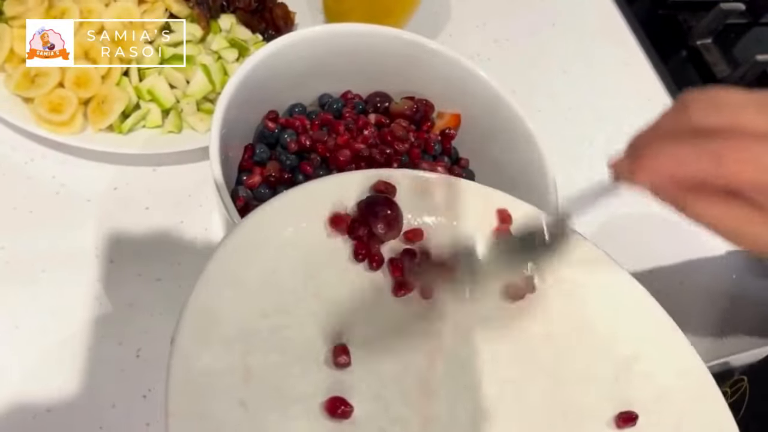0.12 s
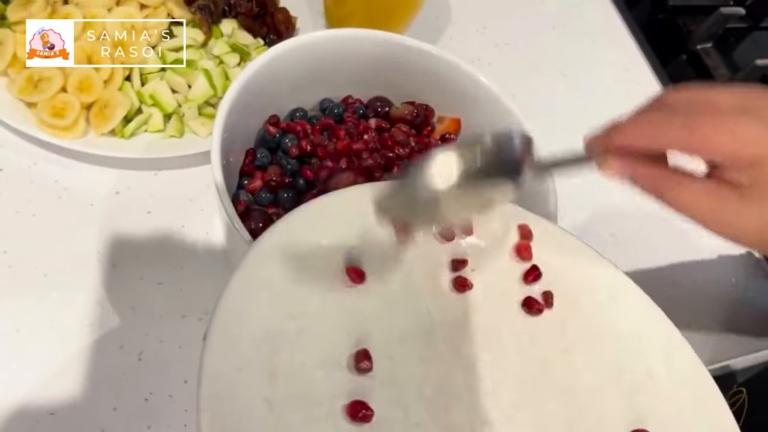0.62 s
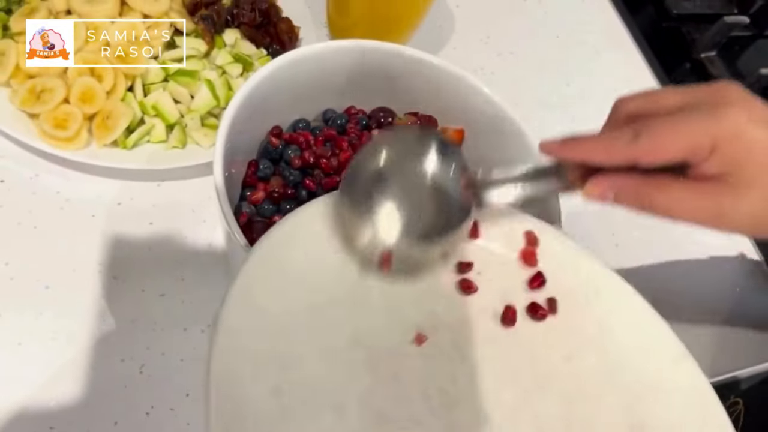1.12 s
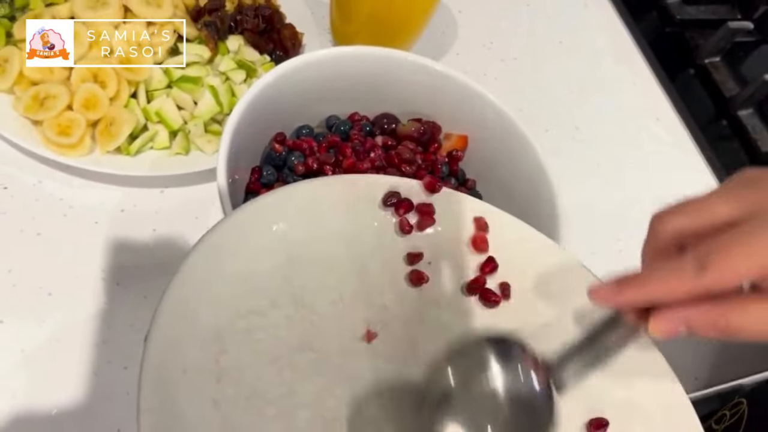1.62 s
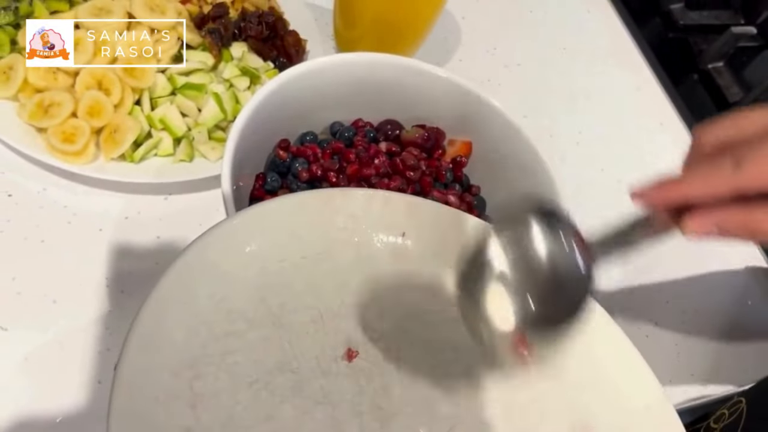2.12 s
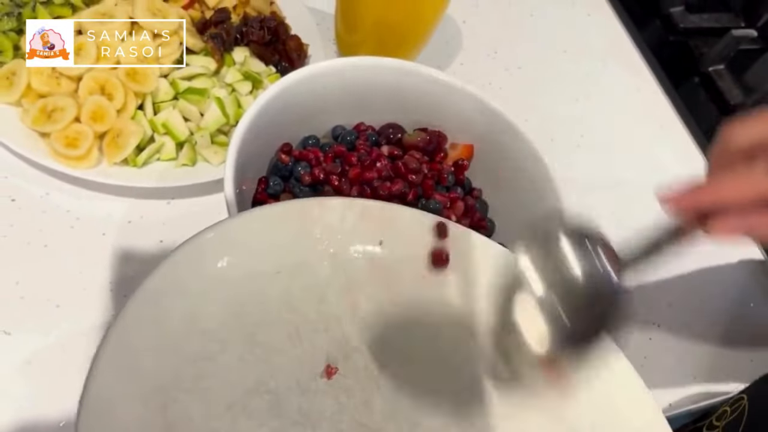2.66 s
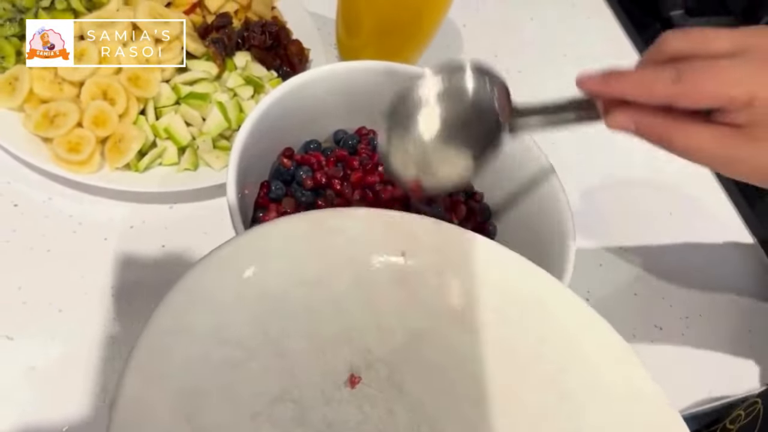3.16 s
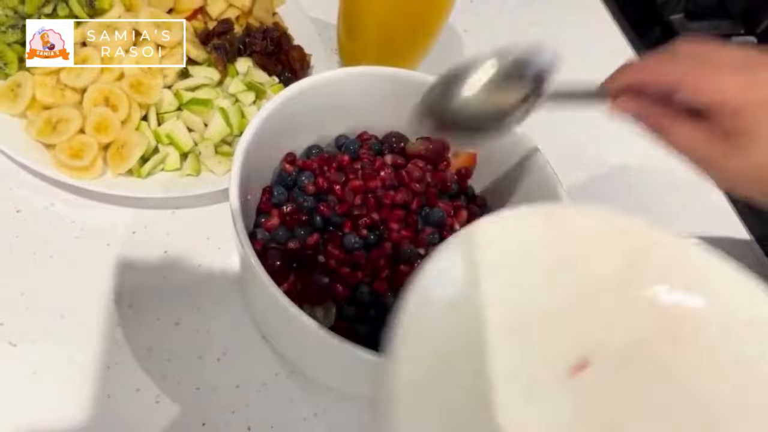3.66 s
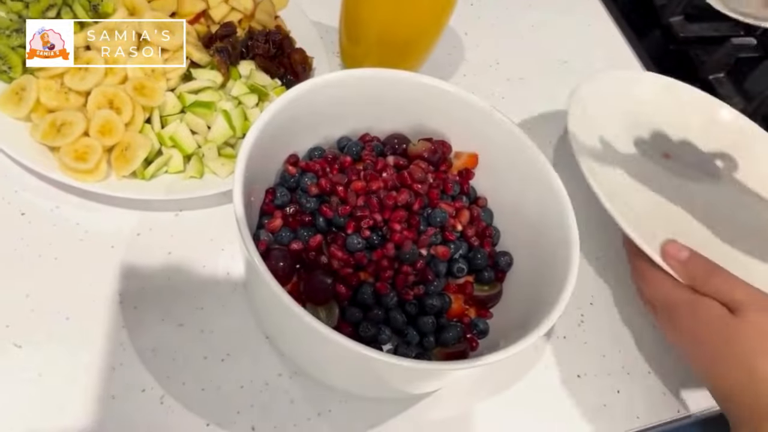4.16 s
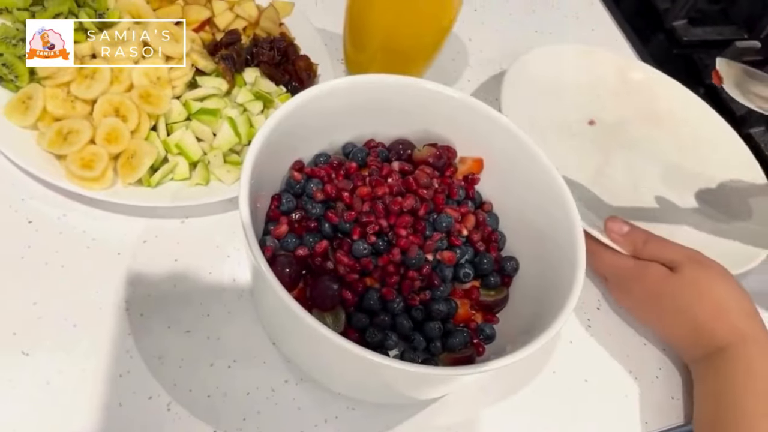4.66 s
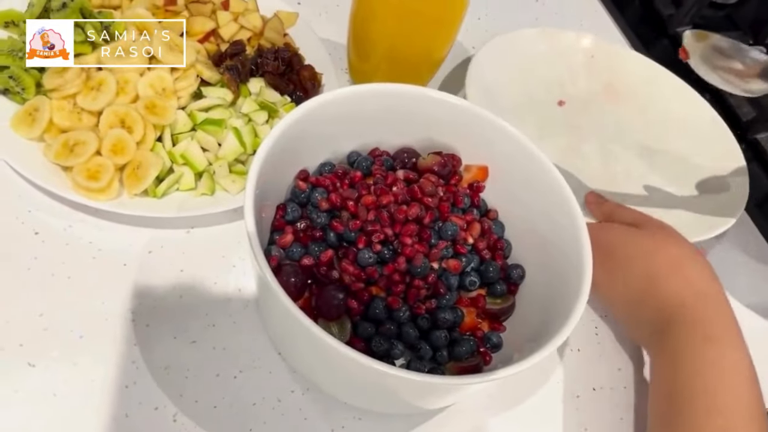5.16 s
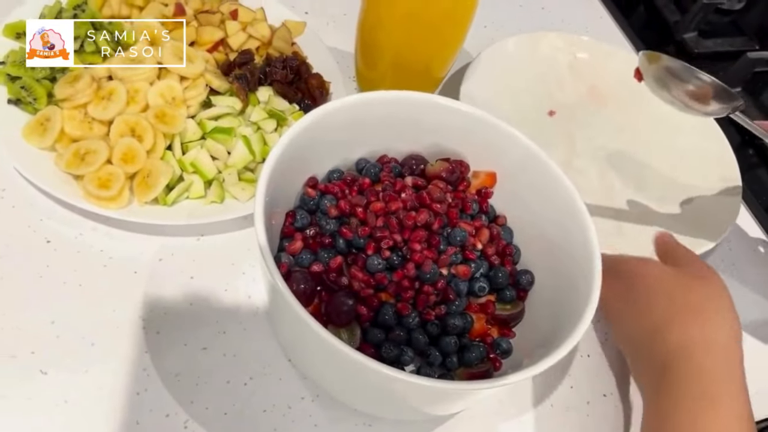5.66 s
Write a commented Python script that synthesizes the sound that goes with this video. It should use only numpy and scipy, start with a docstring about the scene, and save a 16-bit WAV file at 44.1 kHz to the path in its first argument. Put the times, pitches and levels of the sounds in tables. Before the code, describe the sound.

A metal spoon lands on a ceramic plate and scrapes across it repeatedly, then the plate is set down on a stone counter.

```python
"""A steel spoon lands on a hand-held ceramic plate and scrapes across it five times, once chattering hard.
The plate is then set on a stone counter, slides twice and rocks flat. Gritty friction and short blows drive
a bank of ring modes; the hollow under the spoon adds gliding noise, the counter low thuds. A quiet kitchen
hums, hisses and answers with a decaying noise tail."""
import sys
import numpy as np
from scipy import signal
from scipy.fft import rfft, irfft, next_fast_len
from scipy.io import wavfile
from scipy.ndimage import map_coordinates

SR = 44100
rng = np.random.default_rng(int(sys.argv[2]) if len(sys.argv) > 2 else 0)


def attenuation_scalar(level_db):
    """Turn a level in dB into a linear amplitude multiplier (20 dB per decade)."""
    decades = np.asarray(level_db, float) / 20
    return 10 ** decades


def inscribe(sig):
    """Save sig as 16-bit PCM at rate SR to the path in sys.argv[1].

    A 1-D sig is mono; a 2-D sig holds one channel per row.
    Samples are clipped to [-1, 1] before scaling.
    """
    pcm = np.round(np.clip(np.atleast_2d(sig).T, -1, 1) * 32767)
    wavfile.write(sys.argv[1], SR, pcm.astype(np.int16))


N = 255339
PADDED_N = next_fast_len(N + SR)
BINS_HZ = np.fft.rfftfreq(PADDED_N, 1 / SR)
TIME_S = np.arange(N) / SR

# Appliance hum. Each row: pitch in Hz, level in dB rms.
HUM_HZ_DB = [(48.4, -59.5), (118.4, -68), (247.6, -78), (296.1, -68.5), (425.3, -81), (538.3, -80.5)]
# Room air spectrum. Each row: frequency in Hz, relative density in dB per Hz.
AIR_HZ_DB = [(15, -37), (25, -7.5), (55, 3.5), (77, -16), (129, -20), (221, -26), (297, -21.5), (322, -29),
             (537, -28), (648, -36), (762, -29.5), (826, -40.5), (15500, -65.5)]
# Left-right likeness of the air. Each row: frequency in Hz, likeness 0-1.
ALIKE_HZ_SHARE = [(60, 0.92), (240, 0.48), (950, 0.14), (3770, 0.079), (15000, 0.88)]
# Faint hiss as the arm swings away. Each row: time in seconds, level in dB.
RUSTLE_S_DB = [(3.75, -82.5), (3.87, -73.5), (4.21, -80), (4.264, -71.5), (4.36, -78)]
# Decay of the kitchen. Each row: frequency in Hz, t60 in seconds.
KITCHEN_HZ_T60_S = [(200, .5), (1000, 0.28), (4000, 0.4131), (10000, 0.2)]
# Counter modes. Each row: pitch in Hz, t60 in seconds.
COUNTER_HZ_T60_S = [(140, 0.25), (235, 0.15), (345, 0.1)]
# Thuds. Each row: start in seconds, level in dB, dB more for each higher counter mode.
THUDS = [(.229, -40, 7), (0.375, -67.5, 12.5), (.896, -53, 9), (1.557, -50.5, 2.5), (2.323, -65, -0.5),
         (2.855, -54, -6.5), (4.402, -35.5, 1.5), (4.435, -34.5, 2.5), (4.569, -43.5, 3), (4.895, -50, -1),
         (5.188, -58, 11), (5.602, -30, -4)]
# A cloth rustles. Each row: time in seconds, level in dB.
BRUSH_S_DB = [(4.17, -76), (4.26, -64), (4.37, -71)]
# One faint ping: start in seconds, pitch in Hz, level in dB, t60 in seconds.
PING = (2.74, 1871.5, -74, .3)
# Hollow between spoon bowl and plate, a list per stroke. Each row: time in seconds, pitch in Hz, dB rms.
HOLLOW = [
    [(.34, 674.2, -56), (.375, 568.3, -45.5), (.42, 581.4, -49.5), (.475, 602.3, -50.5), (.525, 603, -57.5)],
    [(.93, 720, -54.5), (.99, 862, -42.5), (1.05, 901.7, -50), (1.1, 1141, -49.5), (1.15, 1009, -55),
     (1.2, 930.8, -49.5), (1.25, 920.5, -56.5)],
    [(1.6, 1098, -48), (1.65, 1099, -49.5), (1.71, 1044, -46), (1.73, 743.9, -46), (1.8, 773.3, -51),
     (1.85, 908, -59.5)],
]
# Plate and spoon modes. Each row: pitch in Hz, width in Hz, level in dB relative within its group,
# left over right in dB, left lead in radians.
MODES = [(405, 400, -21, -0.5, 0.6305), (559.43, 81, -17.5, -1, 1), (761.68, 70, -12, -8, 2.5),
         (1043.6, 30, -7.5, -5.5, 1.5), (880, 1600, -13, -1, 1.2111), (1321.6, 66, -14, -3.5, 1.5),
         (1468, 280, -11, 2, 3.5), (1705.4, 43, -8, 2, 1.0652), (2003.2, 100, -13, 1, 3.5),
         (1830, 1300, -14, -0.5, 1), (2500, 240, -14, -8, -1), (2651.8, 17, -1, 0.5, 1.5924),
         (2509.8, 120, -15.5, -1, 4.5), (2738.9, 21, -9.5, 0, 0.9508), (3113.5, 40, -13, -3, 4),
         (2884.5, 790, -21.5, 3.5, 4), (3728.9, 92, -2.5, -4, 1.8507), (3920.3, 80, -9.5, -6, -5),
         (4318.5, 40, -11, -9, -3), (4428.1, 24, -4, -9.5, 0.619), (4820, 60, -26, -7.5, -5),
         (3920.2, 2500, -16.5, -1.5, 1.2489), (5233.9, 50, -4, -10.5, 3), (5774.9, 61, -9.5, -1, 0.5525),
         (5674.4, 40, -18.5, -2, -4.5), (6422, 110, -13.5, -2.5, -3.5849), (6820, 60, -13, -7, -11),
         (6000, 1800, -38, 2, -3), (7500.7, 70, -19, -0.5, -0.5734), (8696, 140, -29, -4, -1.0511),
         (9076.7, 45, -23, -3, 0.7207), (9721.5, 130, -19.5, -0.5, 1.5042), (11351, 270, -29.5, 1, 1.259),
         (11100, 77, -30, 0.5, 6), (12160, 60, -28, 1, 1.5), (13900, 150, -25, -2, 1.344),
         (15000, 90, -35, -0.5, 6), (8330, 63, -30, 2, 4), (12660, 72, -42.5, 6, 1.7455),
         (14430, 80, -33, -1, 3.5)]
# Edges between the six groups of modes, in Hz.
GROUP_EDGES_HZ = [1200, 2300, 3300, 5000, 7000]
# Chattering edge. Each row: time in seconds, bounces per second, share of the drive 0-1.
CHATTER = [(2.3, 150, .05), (2.35, 150, .5), (2.44, 150, .1), (2.85, 150, .1), (2.87, 150, .8),
           (2.93, 200, .9), (2.97, 170, .9), (3.0, 135, .9), (3.06, 165, .8), (3.1, 165, .1)]
# Where bounces drive the modes. Each row: frequency in Hz, part of the share 0-1.
CHATTER_HZ_PART = [(1700, 1), (3500, .55), (6400, .7), (9000, .3)]
# Modes that sing out or are held down as the contact passes their moving parts or nodes.
# Each row: start in seconds, end in seconds, pitch in Hz, extra dB.
SINGS = [(.225, .3, 4440, 8), (.37, .53, 8700, 6), (.38, .5, 3127, -10), (.38, .5, 2886, -8),
         (.44, .52, 4820, 8), (.225, .25, 760, 6), (.91, .97, 2648, 5), (1.05, 1.16, 3960, 6),
         (1.1, 1.21, 2010, 12), (1.127, 1.195, 4440, 8), (1.19, 1.25, 3700, 6), (1.55, 1.63, 2727, 8),
         (1.64, 1.76, 5780, 6), (1.74, 1.82, 2727, 7), (1.75, 1.84, 6420, 6), (1.78, 1.84, 3700, 5),
         (2.32, 2.39, 2648, 13), (2.32, 2.4, 3960, 9), (2.475, 2.52, 2648, 8), (2.85, 3.05, 880, 5),
         (2.85, 3.05, 1830, 5), (2.85, 3.05, 1279, 5), (2.85, 2.98, 4440, 7), (2.9, 3.04, 6420, 7),
         (2.93, 3.01, 2648, 6), (4.4, 4.47, 2010, 7), (4.42, 4.5, 2648, 5), (4.56, 4.62, 550, 8),
         (4.7, 4.98, 3960, 4), (5.6, 5.66, 1040, 7), (5.6, 5.75, 550, -6)]
# Clean landings. Each row: start in seconds, seconds until the pressing hand damps the ring.
LANDINGS = [(.229, .1), (.894, .11), (1.554, .045)]
# Modes that ring freely after a landing. Each row: pitch in Hz, extra dB.
FREE_HZ_DB = [(1710, 10), (2648, 2), (3966, 10.5), (4440, 0.5), (5770, -1), (5830, 5), (7520, 7)]
# Spoon strokes; the first list is the dying room tail of an earlier stroke.
# Each row: time in seconds, pressure in dB, brightness in dB per octave,
# place in steps from the dish centre (negative) to the rim (positive).
STROKES = [
    [(0, -50.5, 0, -2), (.03, -61.5, 0, -2), (.1, -71.5, 6, -1)],
    [(.24, -22.5, -2, -1), (.254, -34, 1.5, 0.5), (.282, -41, 2.5, -0.5), (.358, -52.5, -0.5, 1),
     (.385, -45.5, 3.5, -2.5), (.504, -44.5, 1, -2.5), (.53, -54, -2.5, 0)],
    [(.904, -27, 1, 1.5), (.94, -33, 1.5, 1), (.97, -30.5, 0, 1.5), (1.046, -36, 3, 1),
     (1.14, -37.5, 1, 1.5613), (1.206, -39, 6, 0.13), (1.25, -45, 3, 0)],
    [(1.564, -26.5, 0.5, 0.97), (1.612, -36, 1, 1), (1.662, -36, 4, 0.98), (1.722, -32, 0.5, 0.47),
     (1.762, -30.5, -1, 0.9903), (1.802, -31, 0, 1), (1.85, -46.5, 9.5, 0.8)],
    [(2.332, -32.5, -2, 0.9278), (2.386, -38.5, 1, 0.4235), (2.4, -47.5, 2, 0.5957),
     (2.44, -57, -1.5, 0.9002)],
    [(2.482, -43, 2.5, .5), (2.492, -52, 2.5, 0.7), (2.53, -64, 0.5, 0.57)],
    [(2.864, -23.5, 0, -1), (2.888, -25.5, -2.5, -1), (2.93, -22.5, -0.5, -1), (2.956, -18.5, -1, -.5),
     (3.008, -19.5, 3, 0), (3.048, -28, 3, 0), (3.07, -41, 2, 1)],
]
# The plate's foot drags on the counter. Columns as in STROKES.
SLIDES = [
    [(4.412, -32.5, -0.9236, 1.904), (4.44, -40, -1.139, 1.711), (4.52, -50, 1, 0.324),
     (4.574, -57, 0.463, 0), (4.67, -57, 1, 1.069), (4.734, -53.5, 1, 0.72), (4.916, -50.5, 0.502, 0.1863),
     (5.064, -63, -4.729, 0), (5.12, -81.5, 0.077, 0.374)],
    [(5.15, -85, -3, -1), (5.19, -74, -7, -0.828), (5.238, -78.5, 1, 0), (5.272, -57.5, -3, 0),
     (5.33, -50.5, -1, 0.827), (5.38, -49.5, -0.5, 0.52), (5.502, -68.5, -4, -0.3), (5.56, -64, 2.5, 0.16)],
    [(5.612, -45.5, -7, 0.182), (5.636, -56.5, -3, -1), (5.684, -67.5, 0, 0.21), (5.79, -65, 9, 0)],
]
# The spoon lands or catches. Each row: time in seconds, level in dB, brightness in dB per octave, place.
TAPS = [(.229, -18.5, 2, -4), (.374, -37.5, -2.5, -2), (.713, -67, -8.5, -3), (.896, -13, 0.5, 2),
        (.911, -21, -2, 2), (1.073, -30, 1.5, 1.5), (1.087, -30.5, 2, 3.5), (1.556, -15, 1, 0),
        (1.571, -19, -1, 1), (1.589, -28.5, 1, 3), (1.62, -28, -0.5, 2.5), (1.72, -27, 1.5, -0.5),
        (1.768, -29, 3, 2.5), (1.793, -24, 2, 1.5), (2.324, -25.5, -2, 1), (2.477, -38, 1, 1),
        (2.854, -11.5, 0, -0.5)]
# The plate knocks on the counter. Columns as in TAPS.
KNOCKS = [(4.403, -15.5, 2, 1.263), (4.436, -30, -3, 2.126), (4.568, -41, 2, -2.34),
          (5.186, -55, 4, -2.314), (5.596, -44.5, -9, 0.86), (5.605, -31, -7.5, -0.0915)]
# Drive of steel on glaze. Each row: frequency in Hz, gain in dB.
SPOON_HZ_DB = [(400, -19.5), (700, -17.5), (1150, -8.5), (1700, -6), (2700, -4.5), (4100, 0), (5900, -5),
               (9000, -15.5), (13000, -16.5)]
# Drive of the foot on stone. Each row: frequency in Hz, gain in dB.
STONE_HZ_DB = [(400, 3.5), (550, 12.5), (760, -9.5), (1040, 6.5), (1300, -2), (2200, -6.5), (2650, -9.5),
               (3700, -8), (3960, -6), (4400, -9), (5200, -22.5), (9000, -22)]
# Drive of a tap. Each row: frequency in Hz, gain in dB.
TAP_HZ_DB = [(400, -8.5), (750, -1.5), (1150, -12), (1700, -8.5), (2700, -3), (4100, 1.5), (5900, -5),
             (9000, -5.5), (13000, -11.5)]
# Drive of a knock on stone. Each row: frequency in Hz, gain in dB.
KNOCK_HZ_DB = [(400, 1.5), (550, -6.5), (1040, 0.5), (1400, -0.5), (2000, 0.5), (2650, -22), (4000, -5.5),
               (5500, -26.5), (9000, -27)]
# Effect of place. Each row: frequency in Hz, dB for each step toward the rim.
RIM_HZ_DB = [(553, -5.5), (763, -3), (1279, 0.5), (1710, -1), (2007, 5), (2650, 4), (3127, 3.5), (3700, 0),
             (3966, 1.676), (4820, -2.0839), (5800, 1.1221), (7520, -1.017), (8700, -3.5), (12000, -2)]


def unit(x):
    """Scaled to rms 1."""
    return x / np.sqrt(np.mean(x ** 2) + 1e-20)


def along(points, hz):
    """(Hz, value) points read on a log axis."""
    points_hz, values = np.transpose(points)
    return np.interp(np.log(hz + 1), np.log(points_hz + 1), values)


def gains(rows, fade_s=0.0061):
    """One gain curve per dB column, silent outside the rows."""
    s, *columns_db = np.transpose(rows)
    s = np.r_[s[0] - fade_s, s, s[-1] + fade_s]
    return np.array([np.interp(TIME_S, s, np.r_[0, attenuation_scalar(db), 0]) for db in columns_db])


def wobble(knots_per_s):
    """A smooth random curve."""
    knots = rng.standard_normal(int(N * knots_per_s / SR) + 4)
    return map_coordinates(knots, [np.arange(N) * knots_per_s / SR])


def peak(hz, width_hz):
    """A causal resonance."""
    damping = 1j * BINS_HZ * width_hz
    return damping / (hz * hz - BINS_HZ ** 2 + damping)


def filtered(noise, response):
    """Noise shaped by a frequency response."""
    return irfft(rfft(noise, PADDED_N) * response, PADDED_N)[:, :N]


def partly_shared_noise(own):
    """Stereo noise: a common part plus an own part in each ear."""
    return rng.standard_normal(N) + own * rng.standard_normal((2, N))


def hum():
    """Appliance tones, slightly unsteady in level and phase, slightly louder in the left ear."""
    tones = np.zeros(N)
    for hz, db in HUM_HZ_DB:
        level = np.sqrt(2) * attenuation_scalar(db + 1.3 * wobble(hz / 12))
        tones += level * np.sin(2 * np.pi * hz * TIME_S + .4 * wobble(hz / 15))
    return tones * attenuation_scalar([[.8], [-.8]])


def room_air(level_db=-61.5):
    """Coloured noise whose likeness between the ears varies with frequency."""
    turn = np.arccos(np.clip(along(ALIKE_HZ_SHARE, BINS_HZ), -1, 1)) / 2
    colour = attenuation_scalar(along(AIR_HZ_DB, BINS_HZ)) * np.where(BINS_HZ > 65, 1, .12)
    mid, side = filtered(rng.standard_normal((2, N)), colour * [np.cos(turn), np.sin(turn)])
    return attenuation_scalar(level_db) * unit(np.array([mid + side, mid - side]))


def rustle():
    """A passing treble hiss."""
    hiss = unit(filtered(partly_shared_noise(.4), BINS_HZ / (BINS_HZ + 2500)))
    return gains(RUSTLE_S_DB, .1) * hiss


def kitchen(x):
    """Each frequency of the room's answer dies at its own speed; a fresh tail every quarter second."""
    out, step = np.zeros((2, N + 2 * SR)), SR // 4
    for i in range(0, N, step):
        hz, t, z = signal.stft(rng.standard_normal((2, SR // 2)), SR, nperseg=256)
        decay = attenuation_scalar(-60 * t / along(KITCHEN_HZ_T60_S, hz)[:, None])
        tail = signal.istft(z * decay, SR, nperseg=256)[1]
        wet = signal.fftconvolve(x[None, i:i + step], tail / np.linalg.norm(tail[0]), axes=1)
        out[:, i + 260:][:, :wet.shape[1]] += wet  # the first walls are about 6 ms away
    return out[:, :N]


def counter():
    """Low decaying modes thud through hand, plate and counter."""
    out, t = np.zeros(N + SR), np.arange(SR // 2) / SR
    for s, db, step_db in THUDS:
        ring = np.zeros(len(t))
        for k, (hz, t60_s) in enumerate(COUNTER_HZ_T60_S):
            ring += attenuation_scalar(db + step_db * (k - 1) - 60 * t / t60_s) * np.sin(2 * np.pi * hz * t)
        out[round(s * SR):][:len(t)] += ring * (1 - np.exp(-t / .004))  # soft onset
    return out[:N]


def brush(centre_hz=2143, width_hz=3000):
    """Soft broad noise of rustling cloth."""
    noise = filtered(partly_shared_noise(.5), peak(centre_hz, width_hz) ** 2)
    return gains(BRUSH_S_DB, 0.08788) * attenuation_scalar(2.159 * wobble(26)) * unit(noise)


def ping():
    """A single decaying tone."""
    s, hz, db, t60_s = PING
    t = np.clip(TIME_S - s, 0, None)
    return attenuation_scalar(db - 60 * t / t60_s) * np.sin(2 * np.pi * hz * t)


def hollow(knots_per_s=90, octave_db=-3):
    """Friction noise in an air resonance and its overtone, gliding as the spoon tilts."""
    s, hz, _ = np.concatenate(HOLLOW).T
    turn = 2 * np.pi * np.cumsum(np.interp(TIME_S, s, hz)) / SR
    level = sum(gains(np.array(rows)[:, ::2])[0] for rows in HOLLOW)
    a, b, c, d = (wobble(knots_per_s) for _ in range(4))
    low = a * np.sin(turn) + b * np.cos(turn)
    overtone = c * np.sin(2 * turn) + d * np.cos(2 * turn)
    return level * unit(low + attenuation_scalar(octave_db) * overtone) * attenuation_scalar([[-1.5], [1.5]])


def friction(grit_db=1.6, scatter=.12):
    """Gritty noise and the uneven bounces of a chattering edge, each of rms 1, and the bounces' share."""
    s, bounces_per_s, share = np.transpose(CHATTER)
    rate = np.interp(TIME_S, s, bounces_per_s) * (1 + scatter * wobble(120))
    turns = np.cumsum(rate) / SR
    hits = np.diff(np.floor(turns), prepend=0) > 0
    bounces = unit(hits * attenuation_scalar(1.3 * rng.standard_normal(N)))
    grit = unit(attenuation_scalar(grit_db * wobble(300) + 2 * wobble(90)) * rng.standard_normal(N))
    return grit, bounces, np.interp(TIME_S, s, share)


def drive_db(rows, colour, hz):
    """dB that each row of a contact gives the mode at hz."""
    _, db, bright, place = np.transpose(rows)
    return db + along(colour, hz) + bright * np.log2(hz / 2800) + place * along(RIM_HZ_DB, hz)


def rubbing(hz):
    """Friction gain over time at one mode, from every stroke and slide."""
    kinds = [(rows, SPOON_HZ_DB) for rows in STROKES] + [(rows, STONE_HZ_DB) for rows in SLIDES]
    total = np.zeros(N)
    for rows, colour in kinds:
        s = np.array(rows)[:, 0]
        total += gains(np.c_[s, drive_db(rows, colour, hz)], .0019)[0]
    return total


def singing(hz, edge_s=.012):
    """Extra dB over time for the mode nearest to each listed pitch."""
    modes_hz = np.array(MODES)[:, 0]
    free = [(s, s + lasts_s, pitch, db) for s, lasts_s in LANDINGS for pitch, db in FREE_HZ_DB]
    extra_db = np.zeros(N)
    for a, b, pitch, db in SINGS + free:
        if modes_hz[np.argmin(abs(modes_hz - pitch))] == hz:
            extra_db += db * np.interp(TIME_S, [a - edge_s, a, b, b + edge_s], [0, 1, 1, 0])
    return extra_db


def bent(x, bend_s=.00012, bends_per_s=22):
    """A wavering delay: the moving load pulls a group of modes a little sharp and flat."""
    at = np.arange(N) + bend_s * SR * wobble(bends_per_s)
    return np.array([map_coordinates(ear, [at]) for ear in x])


def mode_shapes(skirt=.35):
    """Resonance curve of each mode, steepened by a wider squared one, signs alternating."""
    shapes = []
    for k, (hz, width_hz, db, _, _) in enumerate(MODES):
        skirt_hz = max(width_hz, min(skirt * hz, 800))
        shapes.append((-1) ** k * attenuation_scalar(db) * peak(hz, width_hz) * peak(hz, skirt_hz) ** 2)
    return shapes


def plate(wander_db=2.5, blow_db=17, blow_s=.001):
    """Rubs and blows drive every mode; a moving contact makes each mode swell and fade on its own."""
    grit, bounces, share = friction()
    blow_at_s = np.array(TAPS + KNOCKS)[:, 0]
    group = np.searchsorted(GROUP_EDGES_HZ, [mode[0] for mode in MODES])
    shapes = mode_shapes()
    power = np.bincount(group, [np.mean(abs(shape) ** 2) for shape in shapes])
    ears = np.zeros((len(power), 2, len(BINS_HZ)), complex)
    for g, shape, (hz, _, _, pan_db, lead_rad) in zip(group, shapes, MODES):
        part = share * np.clip(along(CHATTER_HZ_PART, hz), 0, 1)
        force = rubbing(hz) * (np.sqrt(part) * bounces + np.sqrt(1 - part) * grit)
        # a blow lasts a few ms and reaches each mode at its own instant
        late_s = blow_s * rng.standard_gamma(2, len(blow_at_s))
        blows_db = np.r_[drive_db(TAPS, TAP_HZ_DB, hz), drive_db(KNOCKS, KNOCK_HZ_DB, hz)]
        force[np.round((blow_at_s + late_s) * SR).astype(int)] += attenuation_scalar(blows_db + blow_db)
        # high modes have close nodes and flicker more
        force *= attenuation_scalar(wander_db * hz / 9000 * wobble(10 + hz / 1000) + singing(hz))
        # each mode radiates unevenly to the two microphones
        side = attenuation_scalar(pan_db / 2) * np.exp(.5j * lead_rad)
        ring = rfft(force, PADDED_N) * shape / np.sqrt(power[g])
        ears[g] += ring * np.array([[side], [1 / side]])
    return sum(bent(pair) for pair in irfft(ears, PADDED_N)[..., :N])


def scene():
    """Near sources, their echo in the kitchen, the background."""
    near = plate() + counter() + ping() + hollow()
    echo = attenuation_scalar(-7.5) * kitchen(near[0] + near[1]) / 2
    return near + echo + brush() + hum() + room_air() + rustle()


def roll_off(x):
    """The treble ends steeply here."""
    return signal.sosfilt(signal.butter(12, 16500, fs=SR, output="sos"), x)


def record(dry):
    """The highest peaks are rounded off softly."""
    rounded = dry / (1 + abs(dry / .92) ** 8) ** (1 / 8)
    return roll_off(rounded)


dry = scene()
out = record(dry)
inscribe(out)
```